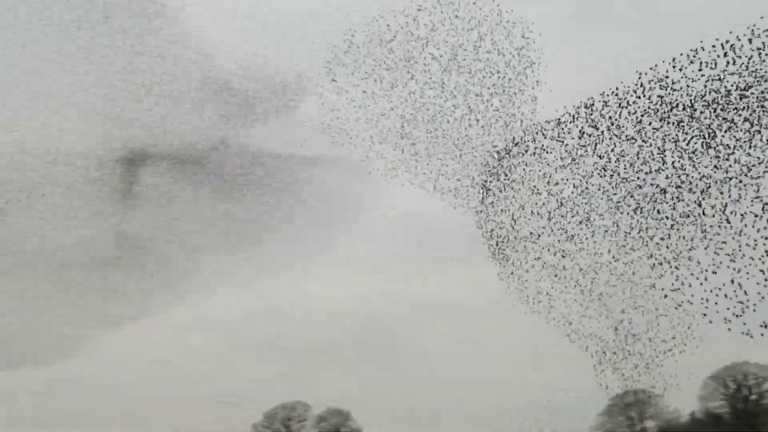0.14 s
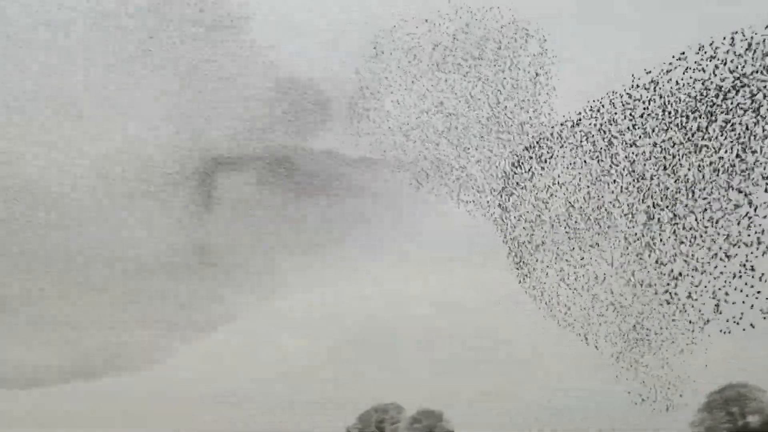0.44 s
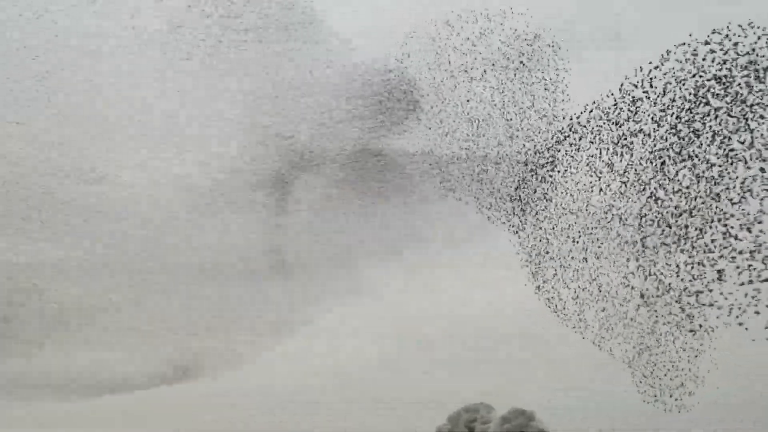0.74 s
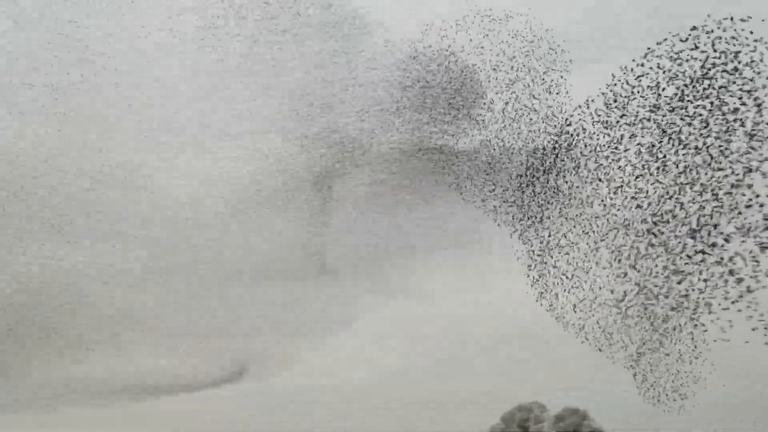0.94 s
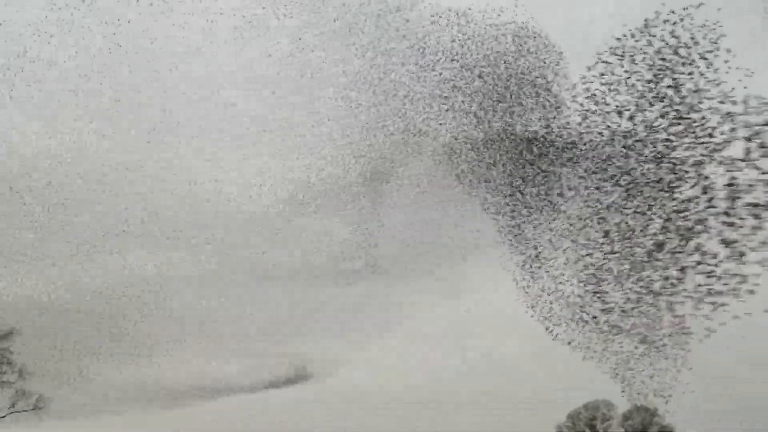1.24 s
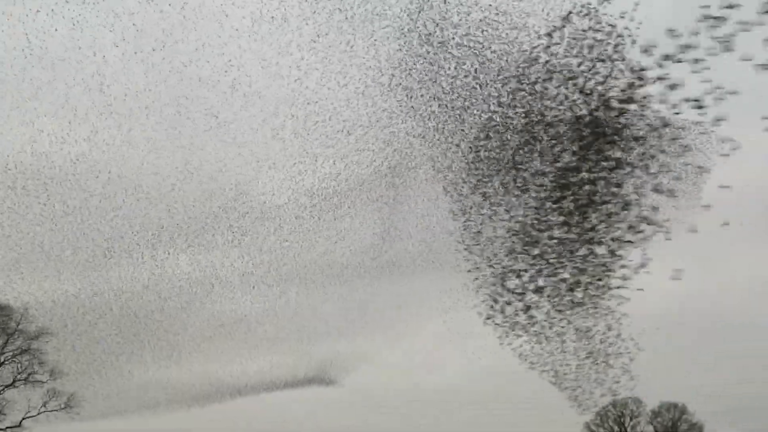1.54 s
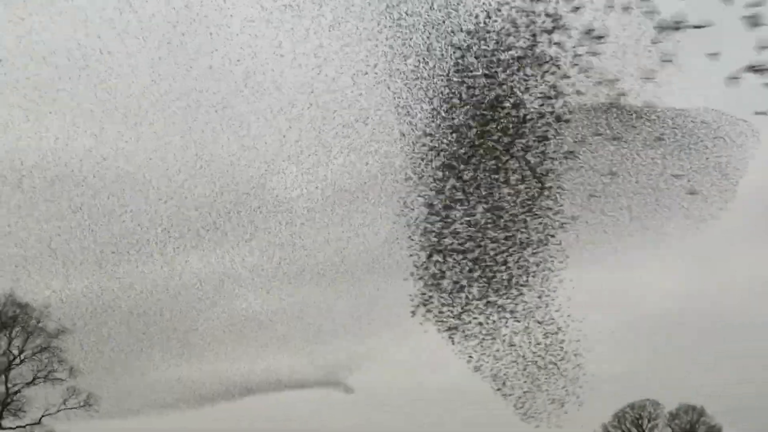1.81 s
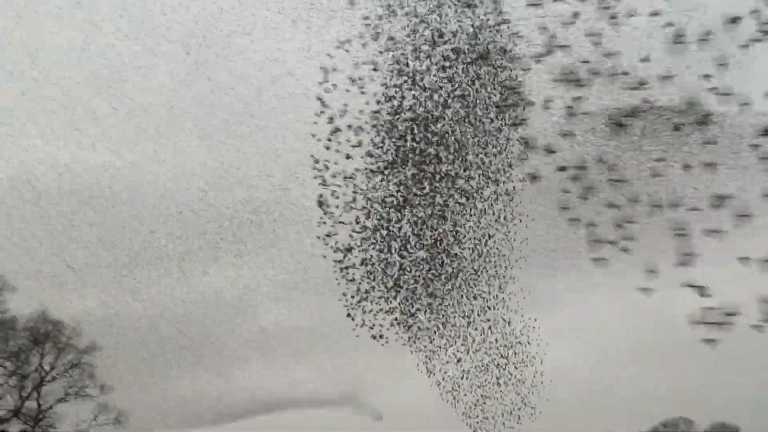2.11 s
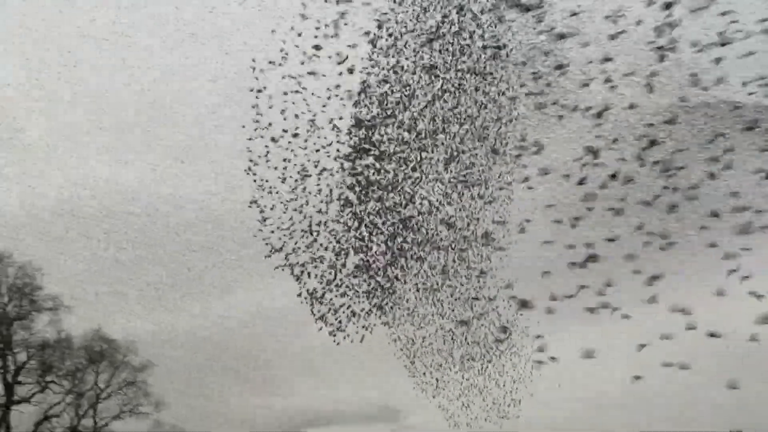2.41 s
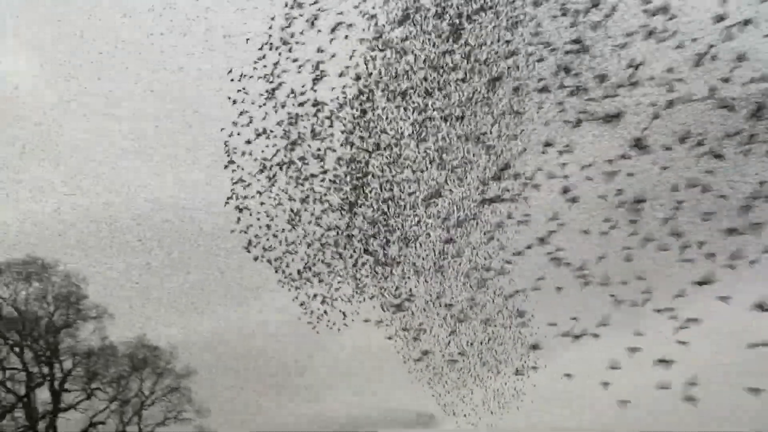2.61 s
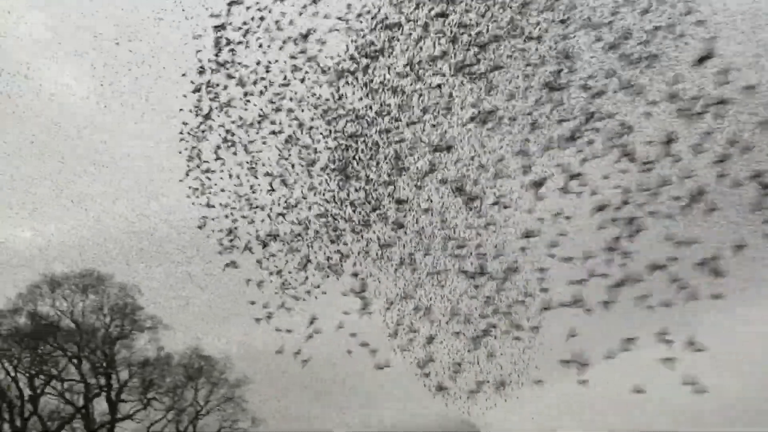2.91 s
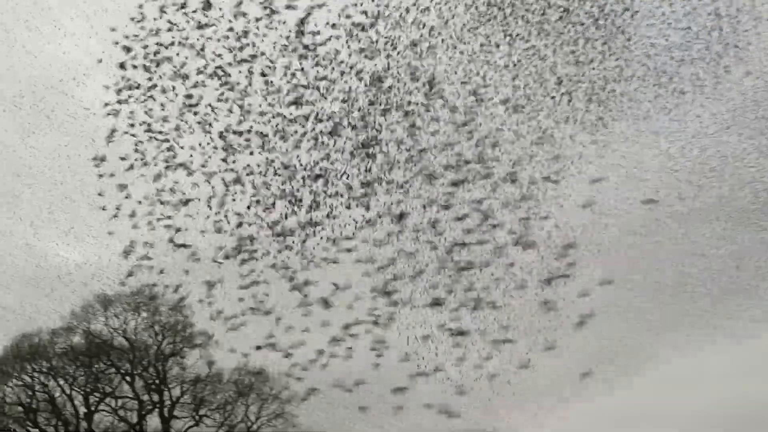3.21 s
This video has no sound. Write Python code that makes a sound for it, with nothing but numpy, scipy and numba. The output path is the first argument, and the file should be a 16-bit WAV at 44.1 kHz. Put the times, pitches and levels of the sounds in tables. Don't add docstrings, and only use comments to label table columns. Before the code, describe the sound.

Thousands of wings whoosh and hiss past outdoors, swelling overhead over buffeting low wind.

```python
import sys
import numpy as np
from scipy import signal
from scipy.fft import rfft, irfft, next_fast_len
from scipy.io import wavfile
from scipy.ndimage import uniform_filter1d
from numba import njit

SR = 44100
rng = np.random.default_rng(int(sys.argv[2]) if len(sys.argv) > 2 else 0)


def digitize_waveform(pressure):
    field = np.atleast_2d(pressure).T
    bounded = np.clip(field, -1, 1)
    quanta = np.round(bounded * 32767).astype(np.int16)
    wavfile.write(sys.argv[1], SR, quanta)


def voltage_ratio(decibels):
    exponent = np.asarray(decibels, float) / 20
    return 10 ** exponent


N = 147735
T = np.arange(N) / SR
PAD = next_fast_len(N + 4096)
F = np.fft.rfftfreq(PAD, 1 / SR)

# [t/s, level/dB, delay of the left port/us (more = further right)]
WAVE_PATH = [(0, -57, 39), (.3, -54.5, 37), (1.0, -52, 38), (1.24, -52.5, 36), (1.7, -50.5, 37.4),
             (1.95, -48.5, 36), (2.12, -47.5, 35), (2.33, -46, 34), (2.45, -50, 32.5), (2.8, -51.5, 17),
             (3.1, -52, 18), (3.35, -52, 19)]
# [f/Hz, level/dB per Hz]
SWISH_COLOUR = [(150, -28), (500, 2), (1500, -3.5), (3000, -8), (5000, -9.5), (7000, -21.5), (10000, -40),
                (16000, -46)]
# [f/Hz, level/dB per Hz]
HISS_COLOUR = [(2000, -17), (4000, 1), (7000, 0.5), (10000, -1.5), (13000, 0.5), (14000, -8.5), (15000, 3),
               (16000, -12)]
# [t/s, centre f/Hz, level/dB]
CLOSE_STROKES = [(0.492, 5570, -53), (.6, 2640, -48), (.69, 6500, -62), (.75, 2400, -60), (.98, 2800, -48),
                 (1.23, 5540, -49), (.59, 1890, -43), (1.07, 2300, -49), (1.97, 2300, -47),
                 (1.22, 2690, -45), (1.41, 5500, -53), (1.62, 2660, -47), (2.28, 4000, -52),
                 (2.36, 3470, -53)]
# [t/s, centre f/Hz, level/dB]
WHISTLE_PATH = [
    (0, 1107, -48),
    (.35, 1110, -46.5),
    (1.1, 1116, -43.5),
    (1.3, 1110, -46.5),
    (1.55, 1125, -44.5),
    (1.9, 1095, -45.5),
    (2.2, 1100, -42.5),
    (2.7, 1083, -46.5),
    (3.35, 1027, -47),
]
# [t/s, peak level/dB, pitch f/Hz]
WING_CLUMPS = [(0.0653, -29.5, 1166), (0.3122, -32, 1090), (0.5172, -33, 1130), (0.5846, -33, 1104),
               (0.6898, -39, 1180), (0.7926, -27, 1190), (0.8669, -38, 1200), (0.9413, -31, 1070),
               (1.1, -29, 1162), (1.5234, -32, 1215), (1.5695, -28.5, 1160), (1.6117, -32, 1050),
               (1.7848, -43, 1000), (1.9709, -29, 1040), (2.0356, -25.5, 1030), (2.0936, -33, 1155),
               (2.174, -28, 1020), (2.2937, -35, 1200), (2.3476, -36, 1096), (2.4139, -47, 1070),
               (2.7526, -28, 1020), (3.0041, -40, 972), (3.1657, -35, 990), (3.2226, -30, 1160)]
# [f/Hz, level/dB per Hz]
FAR_COLOUR = [(100, -2.5), (250, -5.5), (500, -8.5), (750, -11.5), (1500, -14), (2500, -17), (5000, -32),
              (14000, -51.5)]
# [t/s, length/s, pitch f/Hz, level/dB]
FAINT_CALLS = [(.88, .08, 410, -42.5), (.94, .07, 2820, -56), (1.19, .06, 2870, -56),
               (1.37, .07, 2750, -56), (1.58, .07, 2710, -56), (2.18, .07, 3450, -58),
               (3.07, .125, 552, -41), (3.14, .07, 480, -46), (2.35, .07, 455, -45), (.62, .08, 530, -44),
               (.72, .07, 640, -46)]
# [t/s, thud level/dB, rumble level/dB]
GUSTS = [(0.0, -36, -38), (0.19, -38, -43.5), (.6, -39, -37.5), (1.31, -41, -35), (1.55, -38.5, -38),
         (2.38, -39.5, -34), (2.43, -41, -40.5), (2.61, -35, -39.5), (2.65, -45, -35), (2.79, -38.5, -46),
         (2.82, -47, -41), (2.89, -41, -35), (2.98, -39, -42), (3.12, -45, -36), (3.19, -45, -36),
         (3.26, -45, -36.5), (3.35, -42, -36)]
# [t/s, peak level/dB, pitch f/Hz]
AIR_BUFFETS = [(0.049, -27.5, 150), (0.139, -27, 94.2), (0.239, -25.5, 117.9), (0.549, -25, 75.4),
               (0.829, -23, 168.8), (0.969, -25, 70.0), (1.055, -25, 95.6), (1.209, -22, 205),
               (1.339, -27, 148), (1.559, -25, 69.9), (1.769, -20, 148.7), (1.883, -25, 175),
               (2.109, -19, 156), (2.259, -25, 153.2), (2.288, -22, 221), (2.369, -23.5, 201.6),
               (2.492, -21, 156.9), (2.559, -20.5, 116), (2.598, -22, 156), (2.659, -20, 161),
               (2.759, -26, 147.8), (2.889, -24, 156), (3.019, -24, 128.7), (3.156, -21, 160)]

FLAP_HZ, FLAP_SCATTER = 12, 0.4
STROKE_SHARP, CLOSE_DB = 3, 3
SHADE_DB_PER_US = 0.0238


def level(x, db):
    return x * voltage_ratio(db) / np.sqrt(np.mean(x ** 2))


def curve(table, column):
    points = np.array(table)
    return np.interp(T, points[:, 0], points[:, column])


def walk(rate_hz):
    hold = int(SR / rate_hz)
    steps = np.repeat(rng.standard_normal(N // 200), hold)[:N]
    return 1.4 * uniform_filter1d(uniform_filter1d(steps, hold), hold)


@njit
def resonate(x, hz, width, sr):
    y, ring, low = np.empty(len(x)), 0., 0.
    for i in range(len(x)):
        g, damping = np.tan(np.pi * hz[i] / sr), width / hz[i]
        v = (ring + g * (x[i] - low)) / (1 + g * (g + damping))
        ring, low = 2 * v - ring, low + 2 * g * v
        y[i] = damping * v
    return y


def band(hz, width_hz):
    hz = hz + 0 * T
    once = resonate(rng.standard_normal(N), hz, 1. * width_hz, 1. * SR)
    return level(resonate(once, hz, 1. * width_hz, 1. * SR), 0)


def even(x, hold_s):
    power = uniform_filter1d(x ** 2, int(hold_s * SR))
    return level(x / np.sqrt(power + 0.078), 0)


def puffs(table, rise_s, db):
    phases = rng.random(len(table))
    waver = np.cumsum(1 + 0.037 * walk(30)) / SR
    out = 0
    for phase, (start, peak_db, hz) in zip(phases, table):
        age = ((T - start) / rise_s).clip(0)
        swell = age * np.exp(1 - age)
        out = out + voltage_ratio(peak_db + db) * swell * np.sin(2 * np.pi * (hz * waver + phase))
    return out


def ports(x, lag_us, colour_db=0):
    half = np.array([[-.5], [.5]]) * lag_us
    shade = voltage_ratio(4 * half * SHADE_DB_PER_US / (F / 2800 + 2800 / (F + 1)) + colour_db)
    turn = np.clip(2 * np.pi * F * half * 1e-6, -np.pi / 2, np.pi / 2)
    return irfft(rfft(x, PAD) * shade * np.exp(1j * turn), PAD)[:, :N]


def strokes(count):
    chance = rng.random((count, 3))
    t = T[::32]
    hz = FLAP_HZ * (1 + FLAP_SCATTER * (2 * chance[:, :1] - 1))
    beat = np.exp(STROKE_SHARP * np.cos(2 * np.pi * (hz * t + chance[:, 1:2])))
    closeness = voltage_ratio(-2 * CLOSE_DB * np.log(1 - chance[:, 2:]))
    push = (beat * closeness).sum(axis=0)
    return level(np.interp(T, t, np.sqrt(push)), 0)


def flock(colour, lag_us, spread_us, fan_us, count, flicker_db):
    hz, db = np.transpose(colour)
    colour_db = np.interp(np.log(F + 1), np.log(hz), db, left=-60)
    lags = np.linspace(*fan_us, 11)
    shares = np.exp(-.5 * ((lags[:, None] - lag_us - 0 * T) / spread_us) ** 2)
    shares = np.sqrt(shares / shares.sum(axis=0))
    out = 0
    for lag, share in zip(lags, shares):
        swell = share * strokes(count) * voltage_ratio(flicker_db * walk(5.17))
        out = out + ports(swell * rng.standard_normal(N), lag, colour_db)
    return level(out, 0)


def near_swish(lag, db):
    return flock(SWISH_COLOUR, lag - 8, 17.8, (-30, 50), count=24, flicker_db=1.94) * voltage_ratio(db + 8)


def feather_hiss(lag, db):
    spread_us = 5.4 + 0.43 * (lag[0] - lag).clip(0)
    hiss = flock(HISS_COLOUR, lag, spread_us, (-15, 50), count=260, flicker_db=0.0)
    return hiss * voltage_ratio(db + 1.5 + 0.11 * (db + 52))


def close_strokes():
    out = 0
    for t, hz, db in CLOSE_STROKES:
        puff = np.exp(-.5 * ((T - t) / 0.012) ** 2)
        out = out + voltage_ratio(db) * puff * band(hz, hz * 0.34)
    return ports(out, 32)


def whistle():
    hz = curve(WHISTLE_PATH, 1)
    sung = 0
    for ratio, db in ((1.03, -2.0), (0.924, -6.5), (0.835, -10.5)):
        sung = sung + voltage_ratio(db + 0.69 * walk(8.7)) * band(hz * ratio, 152)
    sung = sung * voltage_ratio(curve(WHISTLE_PATH, 2) + 0.5) + puffs(WING_CLUMPS, rise_s=0.0056, db=-7)
    front = np.clip((T - 1.2) / 1.0, 0, 1)
    return ports(sung * (1 - front), 26) + sung * front


def far_mass(lag):
    spread_us = 26.6 - 0.3 * (lag[0] - lag)
    return flock(FAR_COLOUR, 0.56 * lag, spread_us, (-40, 50), count=30, flicker_db=1.5) * voltage_ratio(-37)


def chatter():
    fade = 1 / (1 + np.exp((T - 1.7) / 0.4))
    level_db = -58.5 + 1.33 * walk(14.3) - 8.0 * np.exp(-T / 0.38)
    twitter = band(2800 * (1 + 0.028 * walk(13.3)), 490) * voltage_ratio(level_db)
    return ports(twitter * fade, 230)


def calls():
    out, wobble = 0, 0.045 * walk(40)
    for start, length, hz, db in FAINT_CALLS:
        part = np.clip((T - start) / length, 0, 1)
        bend = (wobble - 0.2 * part ** 2) * 500 / (500 + hz)
        swell = np.sqrt(2 * np.sin(np.pi * part).clip(0))
        out = out + voltage_ratio(db) * swell * np.sin(2 * np.pi * np.cumsum(hz * (1 + bend)) / SR)
    return ports(out, 15)


def wind():
    thud = even(band(60, 82), 0.064) * voltage_ratio(curve(GUSTS, 1) + 0.5)
    rumble = even(band(153 * (1 + 0.095 * walk(4.5)), 156), 0.26) * voltage_ratio(-3.0)
    hum = even(band(156 * (1 + 0.059 * walk(6)), 57), 0.17) * voltage_ratio(-7 + 1.5 * T)
    gusty = (rumble + hum) * voltage_ratio(curve(GUSTS, 2) - 1.5)
    eddies = voltage_ratio(-57) * band(342, 650) + voltage_ratio(-88) * band(50, 80)
    apart = eddies * np.array([[1], [-1]])
    return thud + gusty + apart + puffs(AIR_BUFFETS, rise_s=0.012, db=-9)


def scene():
    db, lag = curve(WAVE_PATH, 1), curve(WAVE_PATH, 2)
    near = near_swish(lag, db) + feather_hiss(lag, db) + close_strokes()
    return near + whistle() + far_mass(lag) + chatter() + calls() + wind()


def top_cut(x):
    return signal.sosfilt(signal.butter(12, 15720, fs=SR, output="sos"), x)


def record(dry):
    lift_db = 1.5 * np.clip(F / 10000, 0, 1) ** 4
    fall_db = 1.1 * (F - 12200).clip(0) / 1000
    mid = dry.mean(axis=0)
    toned_mid = irfft(rfft(mid, PAD) * voltage_ratio(lift_db - fall_db), PAD)[:N]
    mix = dry - mid + toned_mid
    return top_cut(mix)


dry = scene()
out = record(dry)
digitize_waveform(out)
```